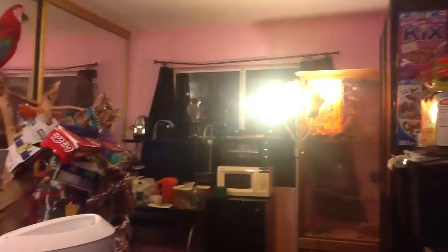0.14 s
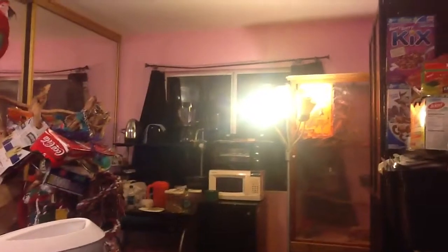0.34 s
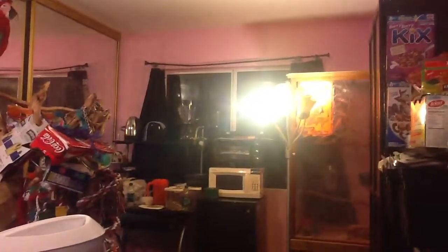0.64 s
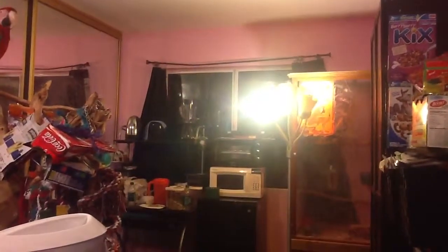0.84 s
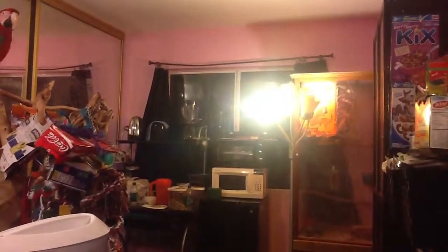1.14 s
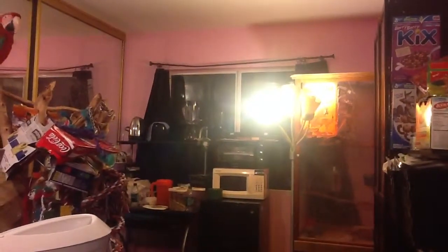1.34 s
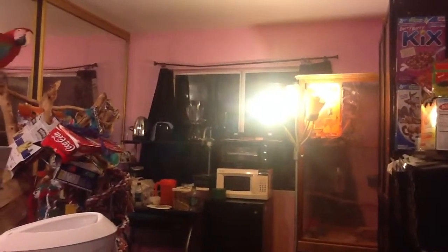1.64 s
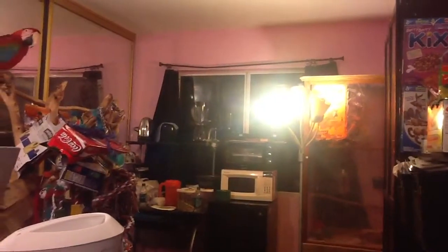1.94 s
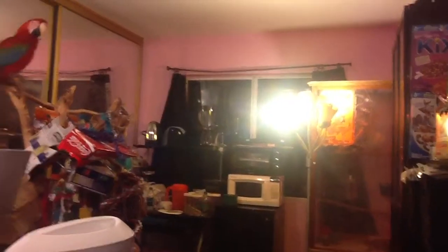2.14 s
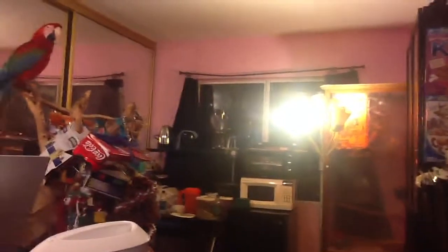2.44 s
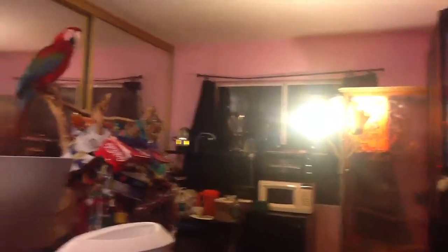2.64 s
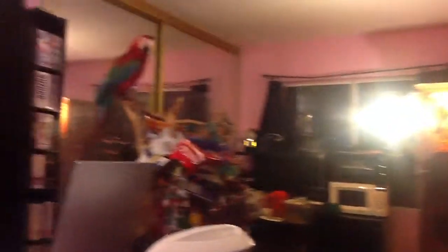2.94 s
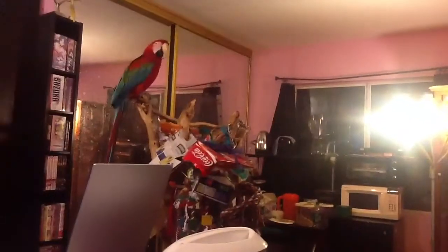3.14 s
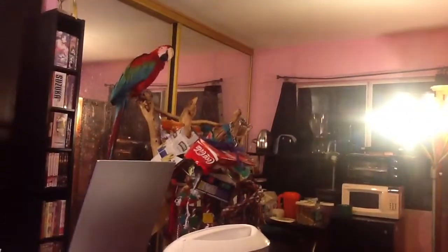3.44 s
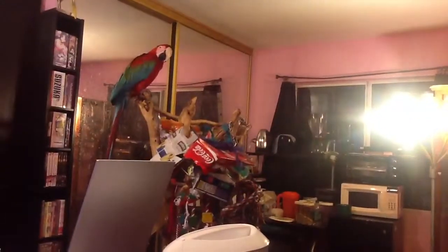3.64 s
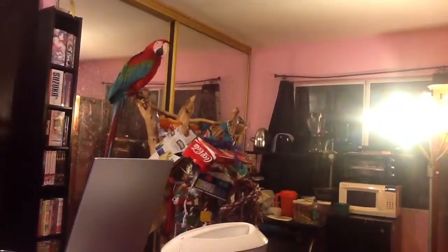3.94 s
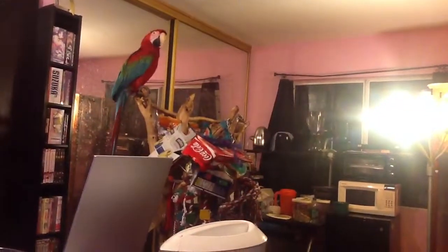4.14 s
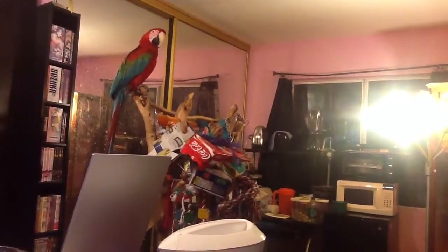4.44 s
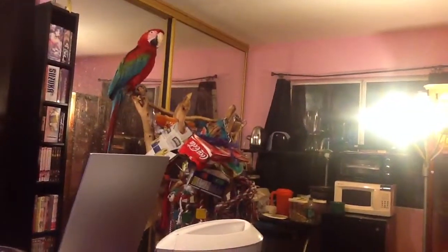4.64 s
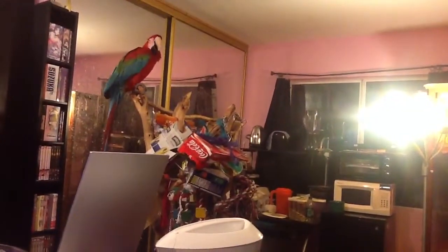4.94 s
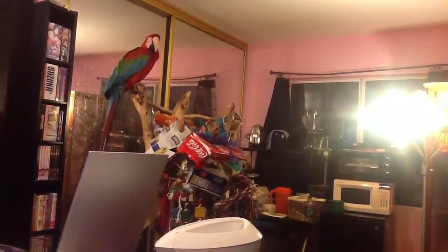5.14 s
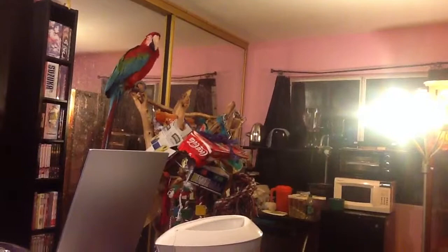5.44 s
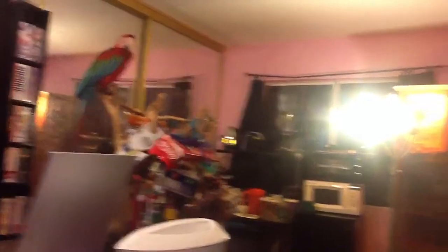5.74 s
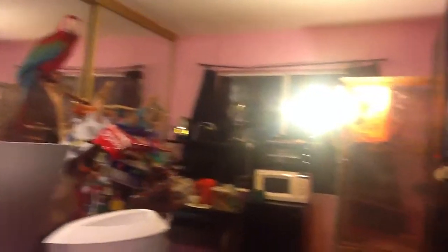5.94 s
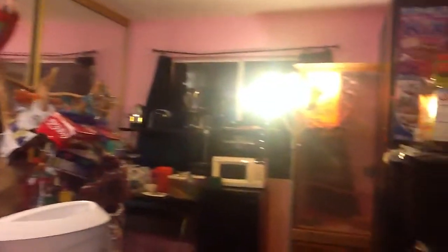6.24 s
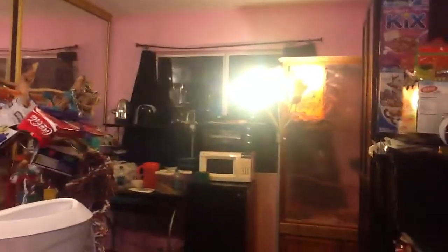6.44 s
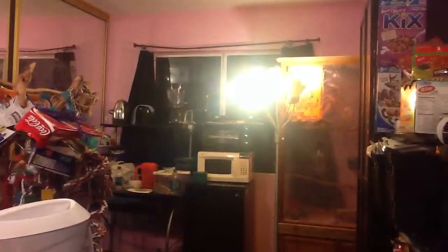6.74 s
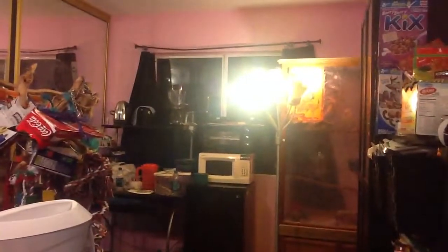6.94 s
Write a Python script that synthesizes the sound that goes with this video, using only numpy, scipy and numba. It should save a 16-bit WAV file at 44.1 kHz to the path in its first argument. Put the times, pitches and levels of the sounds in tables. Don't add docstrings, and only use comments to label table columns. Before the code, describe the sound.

A small lived-in room hums with a steady low appliance drone, centred around a couple of hundred hertz, with faint wavering motor tones and soft microphone hiss. At about 0.45 s a large parrot makes a soft short tonal lead-in, bursting at 0.5 s into a loud, harsh, chaotic screech, raspy and piercing, held until about 1.2 s and cut off sharply. At 1.45 s comes a loud hoarse whoop, sweeping up to a high peak near 1.65 s and falling away by 1.8 s. A quieter, lower whoop follows at 3.3-3.6 s, then a dull one at 4.8-5.15 s, overlapped at its end by a short, flatter, brighter call until 5.3 s. A fuller high whoop rises and falls at 5.9-6.3 s. Faint clock ticks fall near 2.5, 4.5, 5.5 and 6.5 s. Calls leave a short room tail; the drone continues to the end, around 7 s.

```python
import sys
import numpy as np
from scipy import signal
from scipy.fft import rfft, irfft
from scipy.io import wavfile
from scipy.ndimage import uniform_filter1d
from numba import njit

SR = 44100
rng = np.random.default_rng(int(sys.argv[2]) if len(sys.argv) > 2 else 0)


def to_wav(sig):
    pcm = np.clip(np.atleast_2d(sig), -1, 1) * 32767
    pcm = np.round(pcm).astype(np.int16)
    wavfile.write(sys.argv[1], SR, pcm.T)


def level_to_linear(level):
    exponent = np.asarray(level, float) / 20
    return 10 ** exponent


N = 312757


def rms_one(x):
    return x / np.sqrt(np.mean(x ** 2) + 1e-20)


def in_time(rows):
    s, *columns = np.transpose(rows)
    at = np.arange(int(s[0] * SR), int(s[-1] * SR))
    return at, [np.interp(at / SR, s, column) for column in columns]


def at_hz(points, hz):
    points_hz, values = np.transpose(points)
    return np.interp(np.log(hz), np.log(points_hz), values)


def drift(rate_hz, size):
    settle = 9000
    r = np.exp(-2 * np.pi * rate_hz / SR)
    noise = rng.standard_normal(settle + size)
    return rms_one(signal.lfilter([1], [1, -2 * r, r * r], noise)[settle:])


def fade(size, seconds):
    k = np.arange(size)
    return np.clip(np.minimum(k, size - k) / (seconds * SR), 0, 1)


@njit
def resonate(x, cos_w, r):
    y = np.zeros(len(x))
    for i in range(2, len(x)):
        drive = (1 - r * r) / 2 * (x[i] - x[i - 2])
        y[i] = drive + 2 * r * cos_w[i] * y[i - 1] - r * r * y[i - 2]
    return y


def resonance(x, hz, width_hz):
    cos_w = np.cos(2 * np.pi * hz / SR) * np.ones(len(x))
    return resonate(x, cos_w, np.exp(-np.pi * width_hz / SR))


def above(x, hz):
    return signal.sosfilt(signal.butter(6, hz, "high", fs=SR, output="sos"), x)


def appliance():
    # frequency in Hz, density in dB per Hz
    drone_spectrum = [(18, -83.5), (30, -70), (69, -29), (151, -11.5), (181, -4), (241, -1.5), (329, -10.5),
                      (355, -15.5), (647, -17.5), (756, -12.5), (1010, -18.5), (1340, -21), (1650, -19),
                      (4320, -31.5), (15100, -37.5)]
    # centre in Hz, width in Hz, level in dB rms
    casing_modes = [(188.6, 15, -70), (246, 28, -62), (744, 60, -71), (1730, 150, -73.5), (2150, 40, -82.5),
                    (2607, 86, -80.5)]
    # motor tone in Hz, level in dB rms
    motor_tones = [(360.5, -71), (1034.5, -69.5)]
    drone_db = -54.5

    hz = np.maximum(np.fft.rfftfreq(N, 1 / SR), 1)
    spectrum = rfft(rng.standard_normal(N)) * level_to_linear(at_hz(drone_spectrum, hz))
    out = level_to_linear(drone_db) * rms_one(irfft(spectrum, N))

    white = rng.standard_normal(N)
    for centre_hz, width_hz, db in casing_modes:
        band = resonance(resonance(white, centre_hz, width_hz), centre_hz, width_hz)
        out = out + level_to_linear(db) * rms_one(band)

    t = np.arange(N) / SR
    for tone_hz, db in motor_tones:
        level = level_to_linear(db + 0.97 * drift(3.3, N))
        out = out + np.sqrt(2) * level * np.sin(2 * np.pi * tone_hz * t)
    return out


def whoop(rows, manner, hoarse):
    # frequency in Hz, gain in dB
    throat = [(250, 2), (600, -1.5), (1250, 3), (2000, 3.5), (3000, 1), (3800, -3.5), (4500, -2),
              (5500, -11), (6400, -11), (7500, -13), (8600, -27), (10500, -25), (12500, -29),
              (15000, -35.5)]
    glide_s, fall_s = .015, 0.034
    mouth_width_oct, upper_width_oct = 0.42, .25
    beak_shut_db, beak_wide_db = 13.5, 2.5
    upper_ratio, upper_wide_db = 1.996, 12
    beak_slope_db, slack_slope_db = 6.5, -3
    slack_low_db, fall_low_db = -6, 13.5
    taut_hoarseness, fall_hoarseness = .3, .8
    wobble, shimmer_db = .004, 2.5

    at, (pitch_hz, level_db, mouth_hz, beak) = in_time(rows)
    size = len(at)
    pitch_hz = uniform_filter1d(pitch_hz, int(glide_s * SR), mode="nearest")
    slack_oct = np.log2(pitch_hz.max() / pitch_hz)
    falling = np.clip((at - at[np.argmax(pitch_hz)]) / (fall_s * SR), 0, 1)

    slope_db, air_db, low_db = manner
    slope_db = slope_db + beak_slope_db * beak + slack_slope_db * slack_oct
    low_db = low_db + slack_low_db * slack_oct + fall_low_db * falling
    hoarse = hoarse * (taut_hoarseness + np.minimum(2 * slack_oct, 1) + fall_hoarseness * falling)

    order = np.arange(1, 41)[:, None]
    hz = order * pitch_hz
    mouth_oct = np.log2(hz / mouth_hz)
    upper_oct = np.log2(hz / mouth_hz / upper_ratio)
    mouth_db = beak_shut_db + (beak_wide_db - beak_shut_db) * beak
    height_db = at_hz(throat, hz)
    height_db = height_db + mouth_db * np.exp(-.5 * (mouth_oct / mouth_width_oct) ** 2)
    height_db = height_db + upper_wide_db * beak * np.exp(-.5 * (upper_oct / upper_width_oct) ** 2)
    height_db = height_db + air_db * np.clip(hz / 1000. - 5, 0, 1)
    height_db = height_db + slope_db * np.log2(order) + low_db * (order == 1)
    heights = level_to_linear(height_db) * (hz < .4 * SR)
    heights = heights / np.sqrt(np.sum(heights ** 2, axis=0) / 2)

    share = np.clip(hoarse * (order / 3.5) ** 1.5, 0, 1)
    blur = np.array([drift(120, size) for k in range(8)] * 5)
    phase = 2 * np.pi * np.cumsum(pitch_hz * (1 + wobble * drift(60, size))) / SR
    harmonics = heights * np.cos(order * phase + order ** 2)
    voice = np.sum(harmonics * (np.sqrt(1 - share ** 2) + share * blur), axis=0)

    out = np.zeros(N)
    out[at] = voice * level_to_linear(level_db + shimmer_db * drift(40, size)) * fade(size, .008)
    return out


def all_whoops():
    # time in seconds, pitch in Hz, level in dB, mouth resonance in Hz, beak opening 0-1
    lead_in = [(.44, 1040, -61, 1057, 0.047), (.466, 960, -57, 1002, 0), (.502, 996, -47.5, 1020, 0),
               (.54, 983, -52, 1021, 0.0197)]
    whoop_1 = [(1.45, 319.5, -66.5, 1230, 0.2), (1.478, 351.7, -34.5, 1310, 0.44),
               (1.524, 436.9, -22, 2000, 0.3), (1.565, 476.3, -23.5, 1540, 0.3),
               (1.61, 803.6, -16.5, 1400, 0.6), (1.643, 907.4, -14, 1500, 0.82),
               (1.682, 879.7, -23, 1440, 0.4), (1.72, 764, -30.5, 1401, 0.68),
               (1.799, 296, -52, 1300, 0.86)]
    whoop_2 = [(3.27, 327, -60, 1250, 0), (3.312, 340.2, -40.5, 1150, 0), (3.37, 441.7, -38, 1210, 0),
               (3.415, 507.8, -32.5, 1450, 0.14), (3.449, 557, -26.5, 1140, 0.0),
               (3.505, 605, -28.5, 1270, 0.39), (3.536, 541.7, -33, 1420, 0.83),
               (3.568, 421, -37, 1300, .9), (3.62, 281.4, -51, 1250, 0.61)]
    whoop_3 = [(4.831, 295, -57, 1240, 0.024), (4.875, 317.1, -37, 1200, 0), (4.944, 466, -34, 1290, 0.059),
               (5.01, 593, -35.5, 1270, 0), (5.037, 666, -27.5, 1300, 0.34),
               (5.055, 647.7, -28, 1300, 0.34), (5.08, 565.7, -27.5, 1260, 0.72),
               (5.104, 500.7, -31.5, 1170, 1), (5.162, 266, -39, 1100, .9)]
    whoop_4 = [(5.13, 512.6, -47, 1770, 0.37), (5.165, 528, -37, 1750, 0.52), (5.19, 582, -33, 1710, 0.34),
               (5.22, 573.6, -31, 1700, .2), (5.239, 571.4, -28.5, 1710, 0.74),
               (5.262, 567.4, -40.5, 1400, .8), (5.281, 546.4, -35, 1200, 0.89),
               (5.311, 441, -44.5, 1200, 0.48)]
    whoop_5 = [(5.93, 300, -50.5, 1280, 0.08), (5.972, 353.4, -40, 1300, 0.13),
               (6.035, 538.5, -28, 1500, 0.054), (6.072, 752.2, -27, 1520, 0.08),
               (6.108, 822.8, -23, 1670, 0.68), (6.142, 873.3, -23.5, 1630, 0.25),
               (6.196, 745.5, -20, 1580, 0.85), (6.224, 597.2, -26.5, 1600, .9), (6.292, 295, -45, 1500, 1)]
    # source slope in dB per octave, air above 5 kHz in dB, extra on the fundamental in dB
    manners = [
        (-4.5, -4, -7.5),
        (-3, 2, -1.5),
        (-4.5, -3, -1),
        (-5.5, -4.5, -4),
        (-2, 2.5, -10),
        (-2.5, -3, 4),
    ]
    hoarseness = [.25, .45, .5, .3, .25, .13]
    calls = (lead_in, whoop_1, whoop_2, whoop_3, whoop_4, whoop_5)
    return sum(map(whoop, calls, manners, hoarseness))


def screech():
    # time in seconds, level in dB
    effort = [
        (.46, -67),
        (.498, -37.5),
        (.57, -15.5),
        (.63, -14),
        (.9, -16.5),
        (.95, -19),
        (1.15, -20),
        (1.2, -22.5),
        (1.26, -50.5),
    ]
    # centre in Hz, width in Hz, gain in dB
    windpipe = [(623, 70, -15), (918, 200, -23), (1500, 217, -0.5), (2101, 1000, -11.5), (2740, 360, 2),
                (3180, 430, -11), (3810, 620, -3), (4515, 1300, -14), (5300, 560, -4), (6930, 1300, -16),
                (9700, 6200, -27.5), (12000, 2986, -30), (14000, 1300, -33)]
    # time in seconds, upper resonance in Hz
    neck = [(.46, 5100), (.57, 5500), (.63, 5250), (.9, 5300), (1.15, 5530), (1.2, 5850)]
    pulse_hz, jitter, spread_db, breath = 1362.3, .3, 4.5, 0.53
    bright_per_db, beak_opens_s, beak_shut_db = 0.26, 0.67, -4
    body_start_db, body_grows_db_per_s = -1.5, 1.5

    at, (level_db,) = in_time(effort)
    t, size = at / SR, len(at)
    beak_shut = np.clip((beak_opens_s - t) / .03, 0, 1)
    bright_db = bright_per_db * (level_db - level_db.max()) + beak_shut_db * beak_shut
    body_db = body_start_db + body_grows_db_per_s * (t - t[0])
    stretch = np.interp(t, *np.transpose(neck)) / 5300.

    cycles = np.cumsum(pulse_hz * np.exp(jitter * drift(500, size)) / SR)
    pulses = np.diff(np.floor(cycles), prepend=0) * level_to_linear(spread_db * drift(220, size))
    source = rms_one(pulses - pulses.mean()) + breath * rng.standard_normal(size)

    voice = 0
    for k, (hz, width_hz, db) in enumerate(windpipe):
        centre_hz = hz * stretch ** np.clip(hz / 4000.0 - .2, 0, 1) * (1 + .008 * drift(6, size))
        band = resonance(resonance(source, centre_hz, width_hz), centre_hz, 2 * width_hz)
        gain_db = db + 1.0 * drift(8, size) + bright_db * (hz > 4500) + body_db * (hz < 3000)
        voice = voice + (-1) ** k * level_to_linear(gain_db) * band
    out = np.zeros(N)
    out[at] = rms_one(voice) * level_to_linear(level_db) * fade(size, .01)
    return out


def clock():
    # time in seconds, peak in dB
    ticks = [
        (2.499, -63),
        (4.49, -59),
        (5.544, -56),
        (6.545, -59.5),
    ]
    # frequency in Hz, gain in dB, t60 in seconds
    case_modes = [(3460, 0, 0.0135), (5300, 7.5, 0.0075), (6740, 3, 0.013), (9000, -2, .01)]
    clicks = np.full(N, 1e-18)
    for s, db in ticks:
        clicks[round(s * SR)] = level_to_linear(db)
    out = 0
    for hz, db, t60_s in case_modes:
        r, w = level_to_linear(-60 / (t60_s * SR)), 2 * np.pi * hz / SR
        out = out + level_to_linear(db) * signal.lfilter([0, np.sin(w)], [1, -2 * r * np.cos(w), r * r], clicks)
    return out


def room(x, wet_db):
    # frequency in Hz, t60 in seconds
    decay = [(250, .33), (700, .31), (2000, .32), (5000, .3), (12000, .26)]
    t = np.arange(int(.7 * SR)) / SR
    edges_hz = 150 * 2 ** np.arange(0, 7.1, .5)
    tail = 0
    for low, high in zip(edges_hz, edges_hz[1:]):
        half_octave = signal.butter(2, [low, high], "band", fs=SR, output="sos")
        band = signal.sosfilt(half_octave, rng.standard_normal(len(t)))
        tail = tail + band * level_to_linear(-60 * t / at_hz(decay, np.sqrt(low * high)))
    tail = tail * np.clip((t - .003) / 0.0043, 0, 1)
    tail = level_to_linear(wet_db) * tail / np.sqrt(np.sum(tail ** 2))
    return (x + signal.fftconvolve(x, tail)[:N]) / np.sqrt(1 + level_to_linear(wet_db) ** 2)


def scene():
    whoops = above(all_whoops(), 220)
    screeching = room(above(screech(), 560), wet_db=3)
    whoops_and_clock = room(whoops + clock(), wet_db=0)
    return (screeching + whoops_and_clock + appliance())[None]


def top_cut(x):
    return signal.sosfilt(signal.butter(12, 15220, fs=SR, output="sos"), x)


def record(dry):
    return top_cut(dry)


dry = scene()
out = record(dry)
to_wav(out)
```